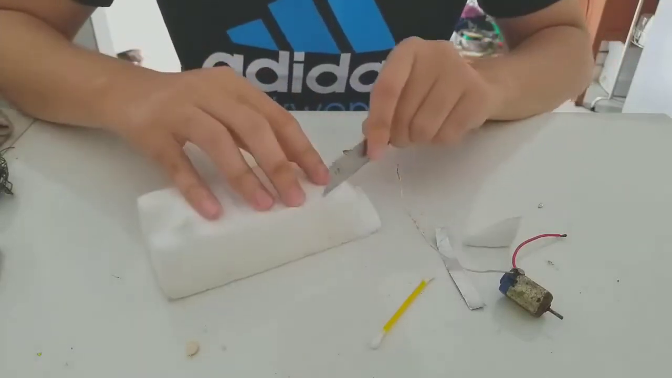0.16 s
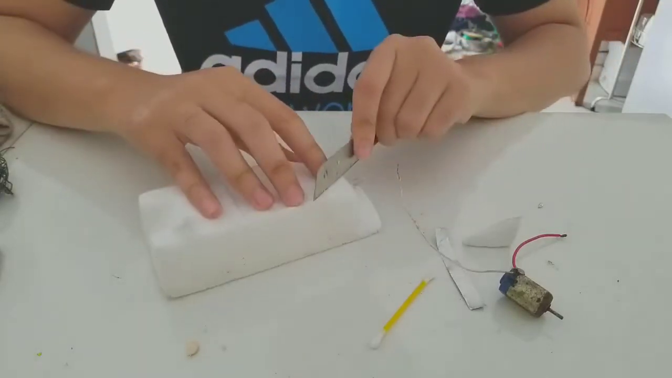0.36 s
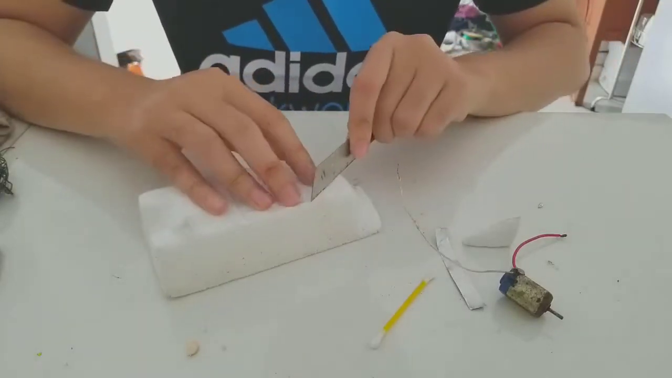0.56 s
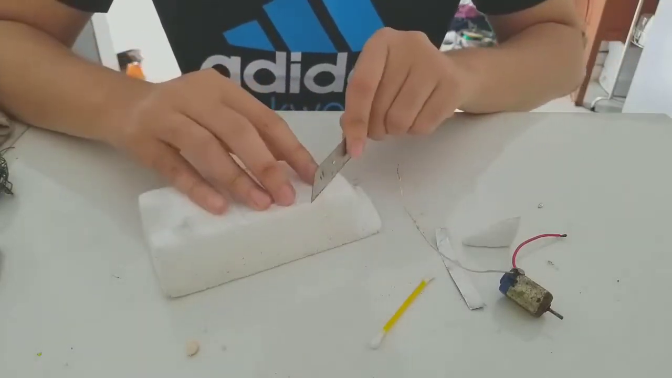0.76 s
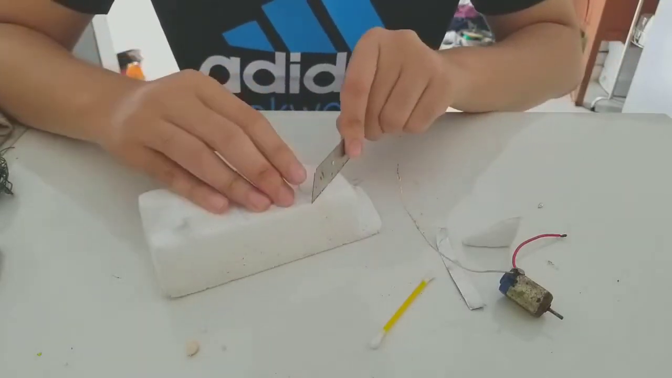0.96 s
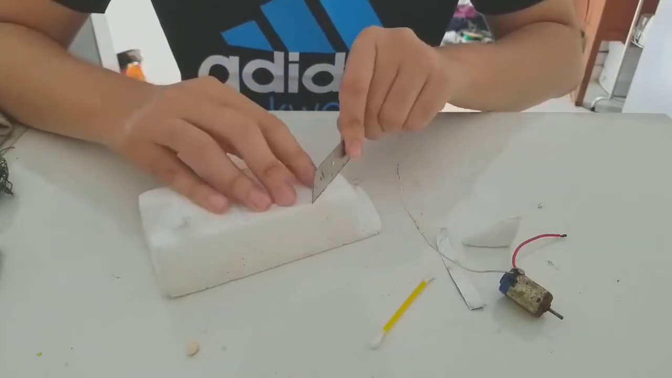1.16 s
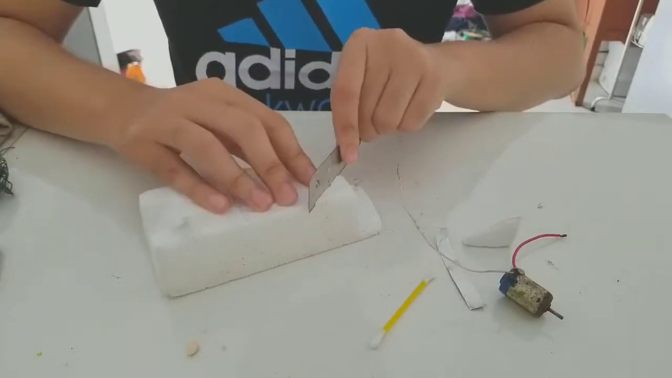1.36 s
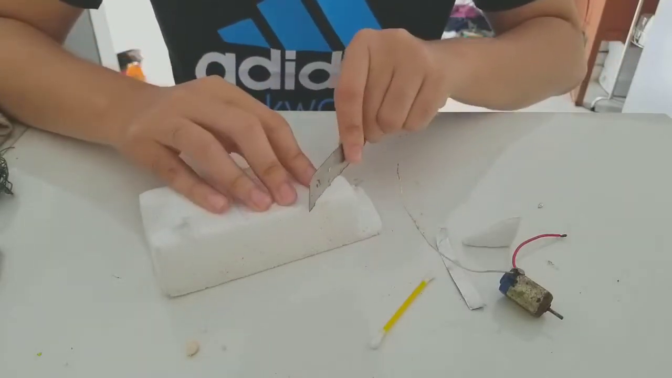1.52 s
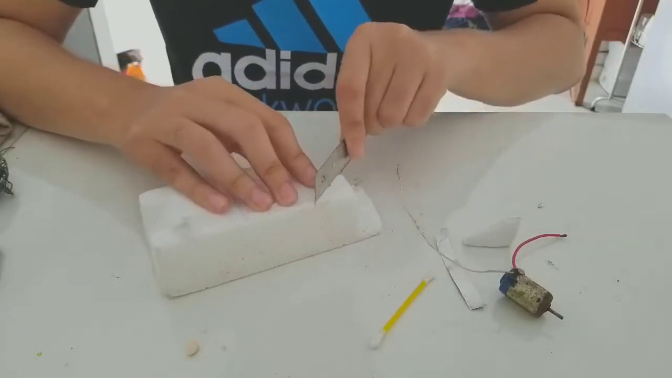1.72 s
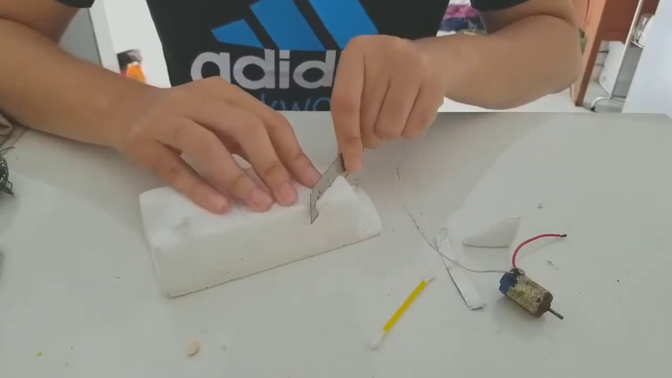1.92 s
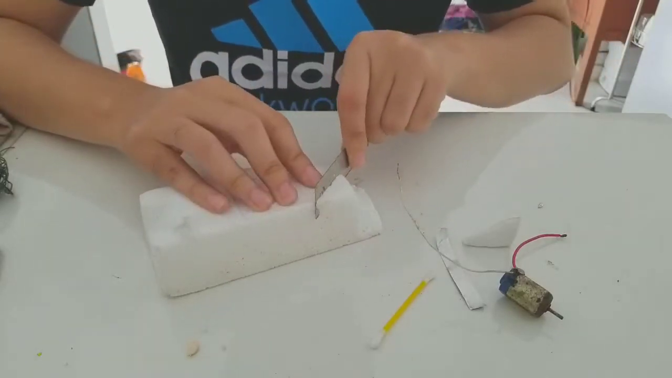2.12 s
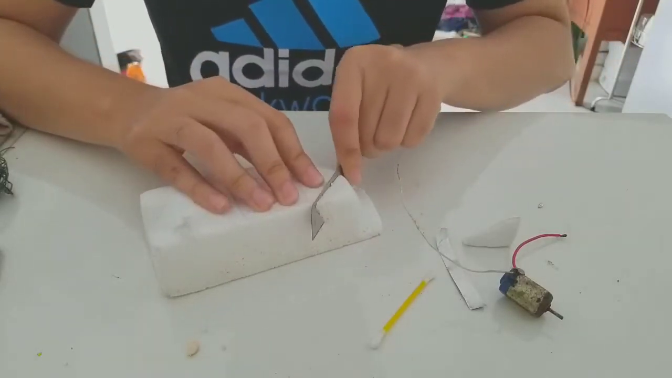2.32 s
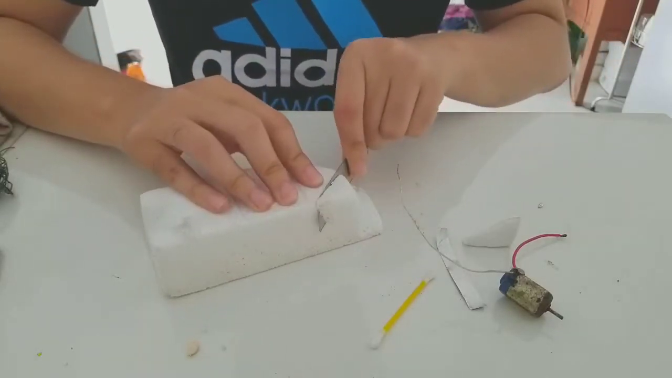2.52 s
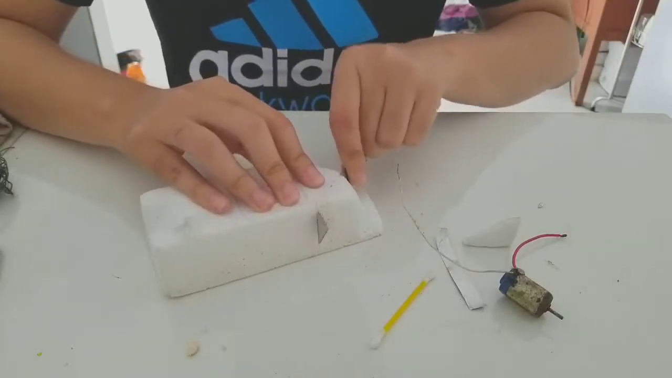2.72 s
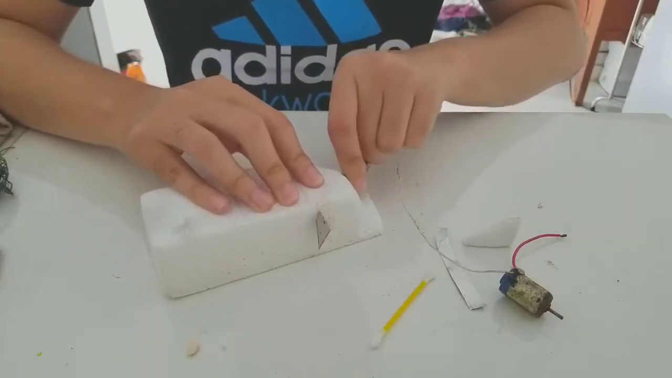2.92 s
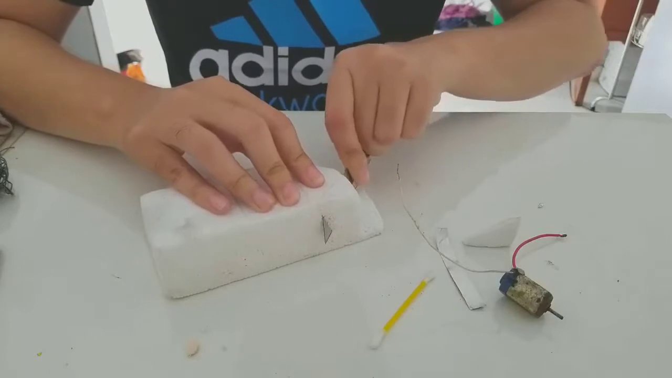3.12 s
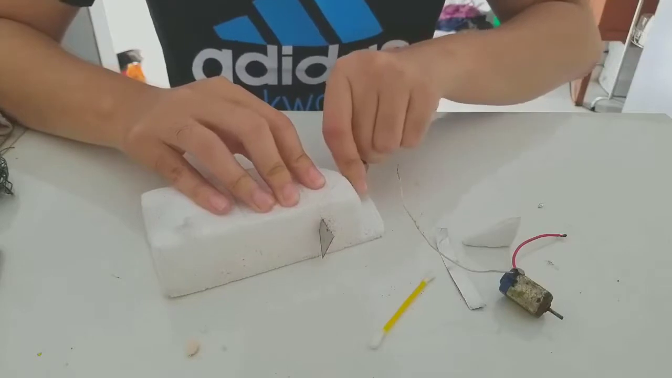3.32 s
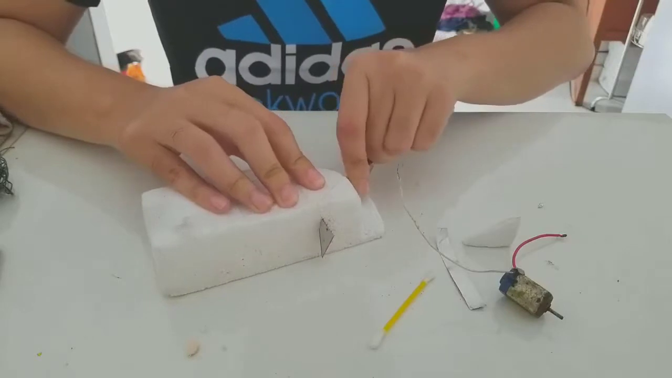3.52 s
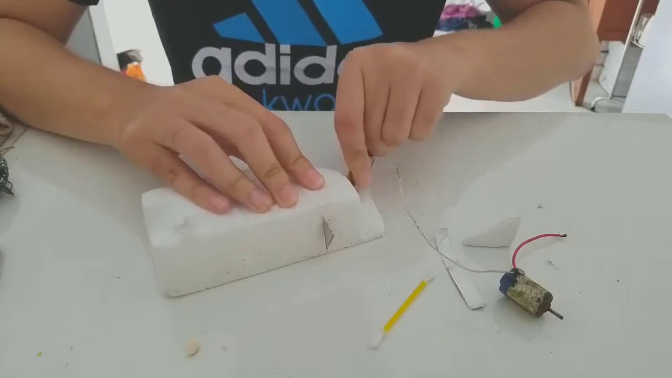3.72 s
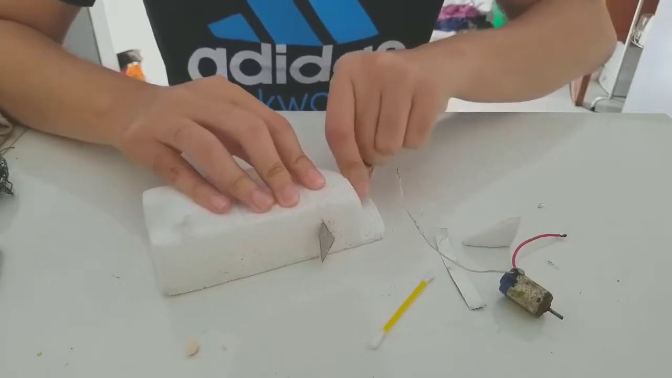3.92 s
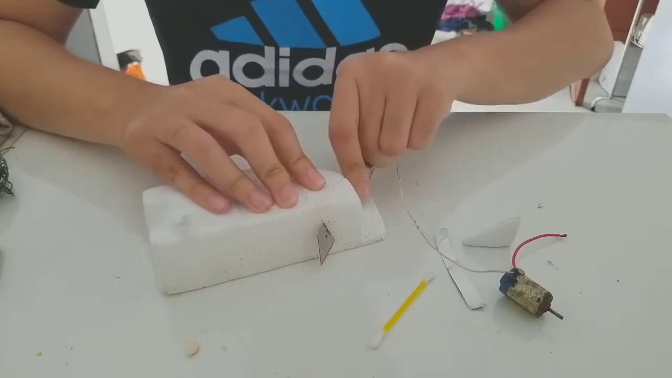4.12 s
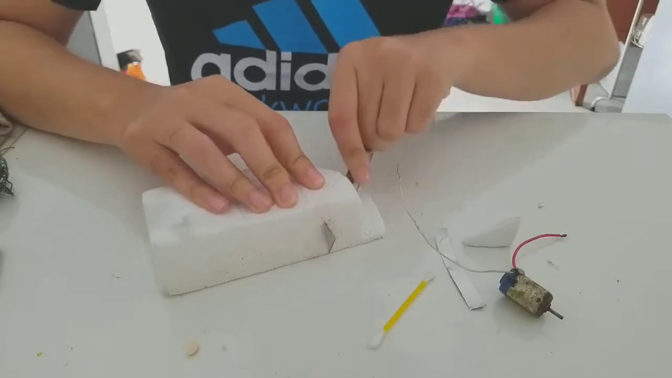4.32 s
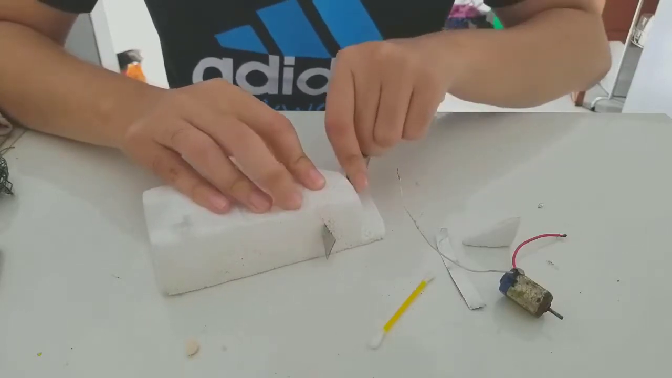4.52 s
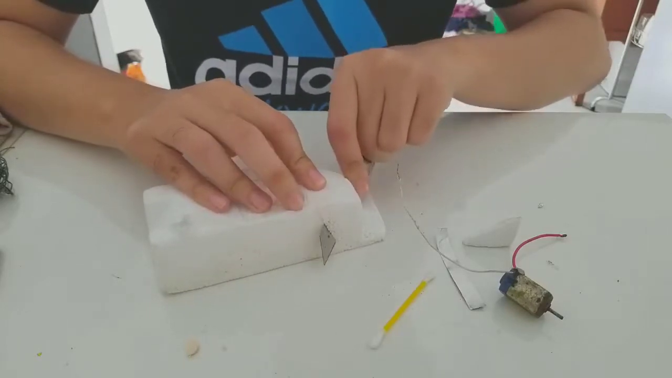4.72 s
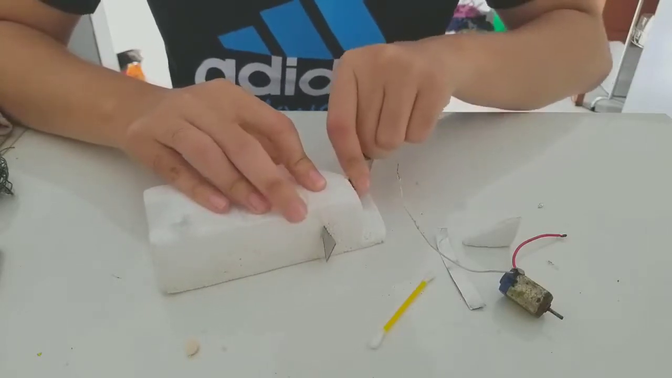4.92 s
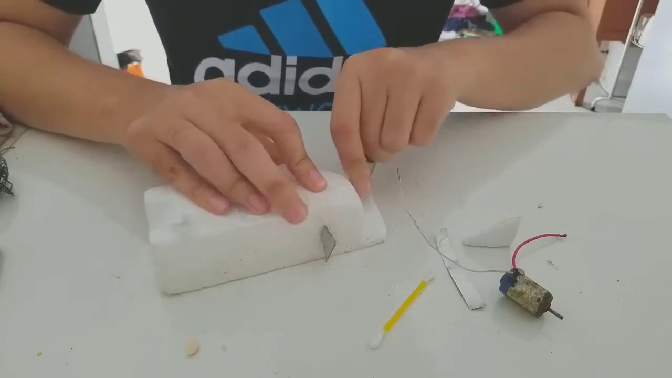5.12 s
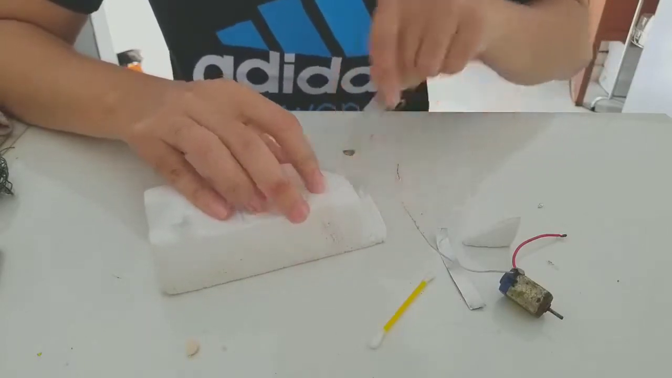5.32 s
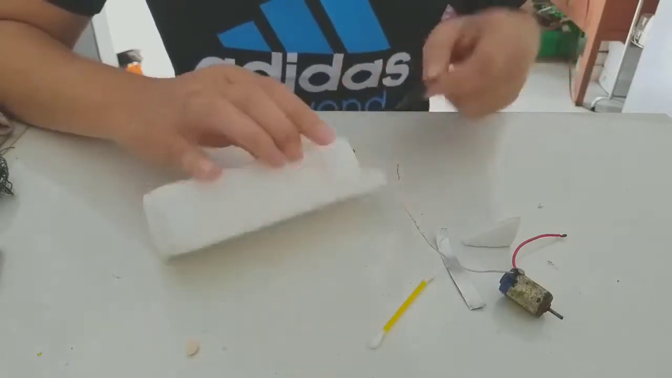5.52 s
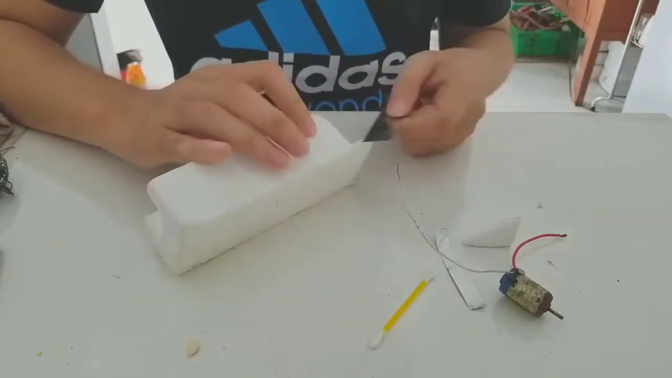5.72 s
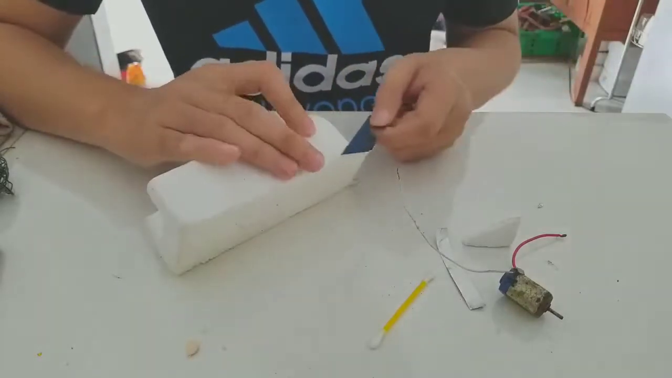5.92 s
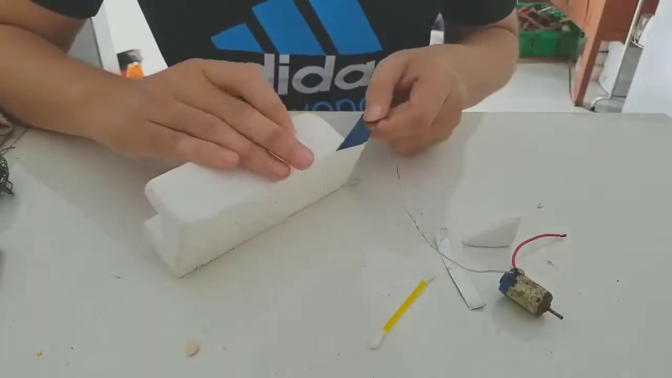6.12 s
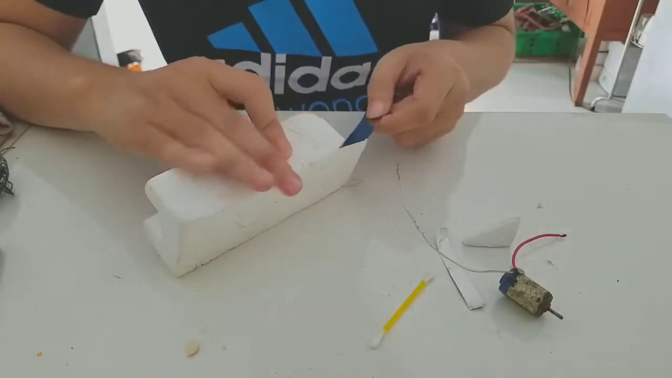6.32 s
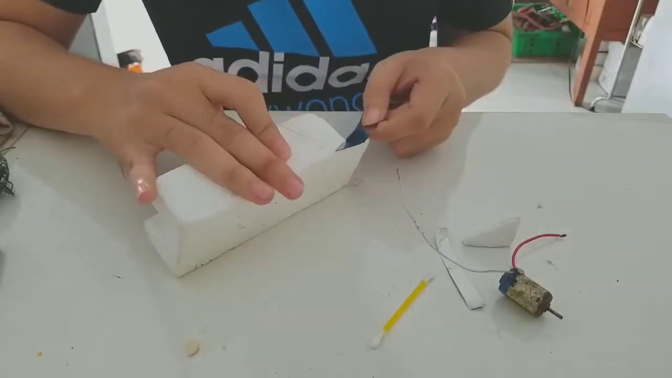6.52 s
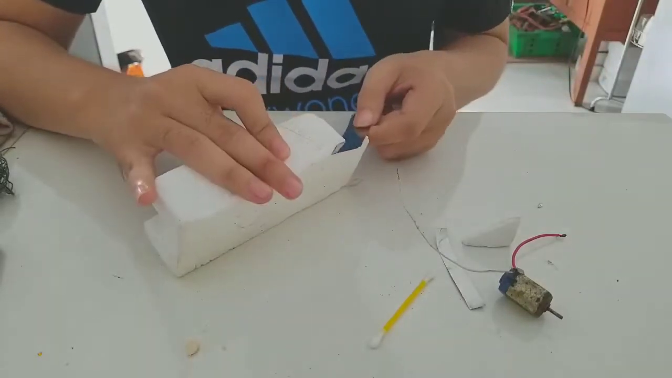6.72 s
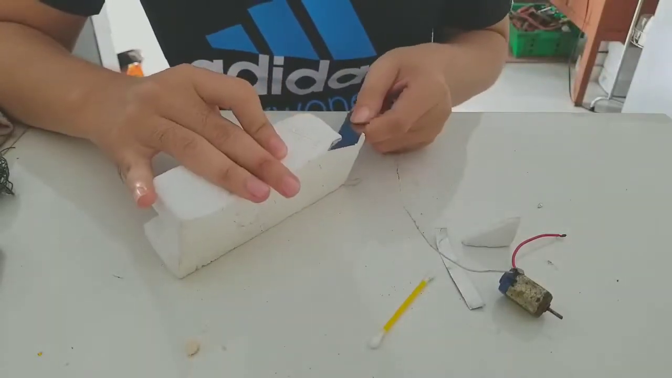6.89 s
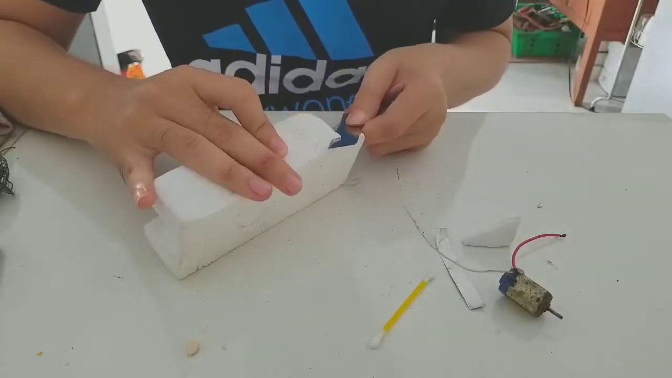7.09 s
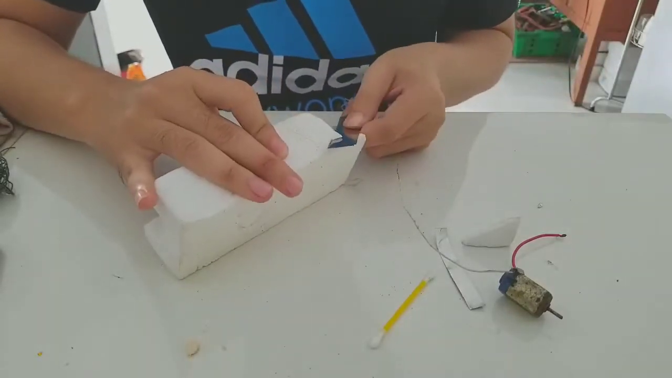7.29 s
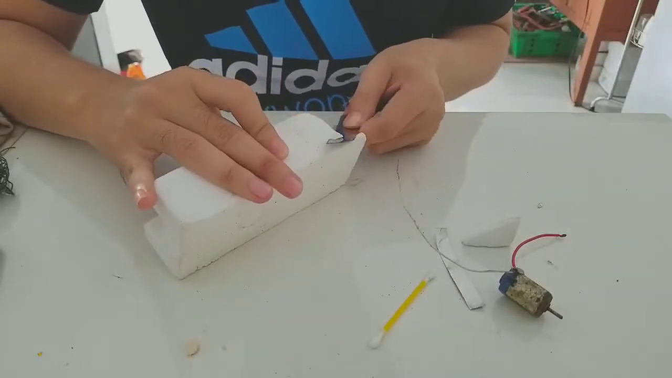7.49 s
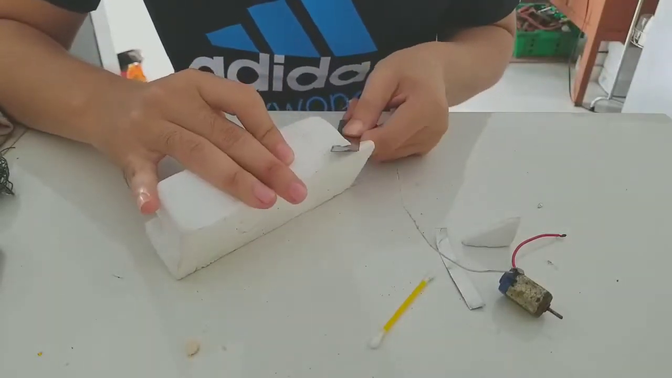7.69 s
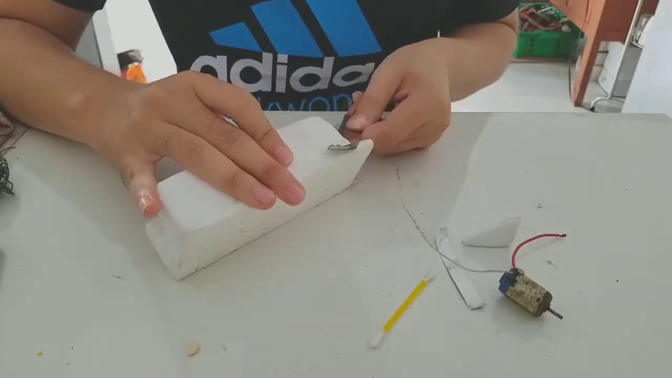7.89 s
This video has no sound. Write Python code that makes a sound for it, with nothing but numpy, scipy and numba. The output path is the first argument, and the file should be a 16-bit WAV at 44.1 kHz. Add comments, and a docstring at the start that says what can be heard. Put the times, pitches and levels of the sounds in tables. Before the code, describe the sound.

Close, crisp strokes rasp through a foam block, pausing irregularly, squeaking sharply at times, while the block thuds softly in a quietly humming room.

```python
"""In a small room with a faint fan hum, a thin blade saws through polystyrene foam on a table, close by.
Each stroke is a dense random stream of bursting cells, which hiss, tear in the slit and ring the block.
Beads snap as decaying noise, the block slides and bumps on the table, and the blade squeals by stick-slip.
The block is turned over partway through, and its dull low note grows stronger."""
import sys
import numpy as np
from scipy import signal
from scipy.fft import rfft, irfft, next_fast_len
from scipy.io import wavfile
from numba import njit

SR = 44100
rng = np.random.default_rng(int(sys.argv[2]) if len(sys.argv) > 2 else 0)


def waveform_to_disk(signal):
    """Save audio, clipped to [-1, 1], as 16-bit WAV at the path in sys.argv[1]."""
    frames = np.transpose(np.atleast_2d(signal))
    scaled = np.clip(frames, -1, 1) * 32767
    samples = np.round(scaled).astype(np.int16)
    wavfile.write(sys.argv[1], SR, samples)


N = 350595
TIME = np.arange(N) / SR
CUTOFF_HZ = 16000


def from_db(db):
    """Decibel law: 20 dB is a factor of ten in amplitude."""
    return 10 ** (np.asarray(db) / 20)


def rms_one(x):
    """Normalisation to unit root-mean-square amplitude."""
    return x / np.sqrt(np.mean(x ** 2) + 1e-20)


def in_time(rows):
    """Linear interpolation of each column over time."""
    s, *columns = np.transpose(rows)
    return [np.interp(TIME, s, column) for column in columns]


def drift(rate_hz):
    """Low-passed noise: a random wander of rms 1 from two equal poles at the given rate."""
    # computed at a twentieth of the sample rate; the first 4000 values let the filter settle
    pole = np.exp(-40 * np.pi * rate_hz / SR)
    noise = rng.standard_normal(N // 20 + 4002)
    slow = signal.lfilter([1], [1, -2 * pole, pole * pole], noise)[4000:]
    return np.interp(np.arange(N) / 20, np.arange(len(slow)), rms_one(slow))


def colour(x, spectrum):
    """Spectral shaping: a gain curve, straight in dB over log frequency, then scaling to rms 1."""
    size = next_fast_len(N)
    hz, db = np.transpose(spectrum)
    log_hz = np.log(np.maximum(np.arange(size // 2 + 1) * SR / size, 1))
    gain = from_db(np.interp(log_hz, np.log(hz), db, left=-90, right=-90))
    return rms_one(irfft(rfft(x, size) * gain, size)[..., :N])


def butter(x, hz, kind, order=2):
    """Butterworth filtering: a maximally flat passband."""
    sections = signal.butter(order, hz, kind, fs=SR, output="sos")
    return signal.sosfilt(sections, x + 1e-18)


@njit
def resonate(x, hz, width_hz):
    """Damped resonance: two poles whose centre moves while the bandwidth stays fixed."""
    y, r = np.zeros(len(x)), np.exp(-np.pi * width_hz / SR)
    for i in range(2, len(x)):
        drive = (1 - r * r) / 2 * (x[i] - x[i - 2])
        y[i] = drive + 2 * r * np.cos(2 * np.pi * hz[i] / SR) * y[i - 1] - r * r * y[i - 2]
    return y


def lagged(x, count):
    """Time-of-arrival stereo: the left port hears a few samples later."""
    return np.array([np.pad(x[0], (count, 0))[:N], x[1]])


# Fan hum. Each row: frequency in Hz, mean level in dB rms before the wavering and channel trim.
FAN_HUM = [(98.6, -56), (123.8, -60), (148.6, -56.5), (251, -64), (399, -73.5), (490.5, -72)]
# Spectrum of the dull room noise. Each row: frequency in Hz, relative gain in dB.
ROOM_NOISE_SPECTRUM = [(22, -17), (35, -16), (50, -3.5), (70, 4), (105, -4), (150, -3), (200, -8.5),
                       (300, -15.5), (430, -19), (560, -28), (720, -33.5), (1200, -44), (2000, -49),
                       (4500, -70), (12000, -50.5), (16000, -53.5)]


def background(rumble_db=-53.0, width_db=-11, waver_db=3.0):
    """Superposition: sinusoids of wandering level and phase over mid-side coloured noise."""
    hum = np.zeros(N)
    for hz, db in FAN_HUM:
        level = np.sqrt(2) * from_db(db + waver_db * drift(5.7))
        hum += level * np.sin(2 * np.pi * hz * TIME + 0.8 * drift(2.2))
    mid, side = colour(rng.standard_normal((2, N)), ROOM_NOISE_SPECTRUM)
    # the noise is wider above 300 Hz
    side = from_db(width_db) * side + from_db(-2.5) * butter(side, 300, "high")
    return hum + from_db(rumble_db) * (mid + side * np.array([[1], [-1]]))


def stroke_shape(start_s, length_s, rise_db, swell_db, ease_db, attack_db_per_s, fade_db_per_s):
    """Exponential onset and decay: straight lines in dB around a flat arch that leans with the pressure."""
    done = np.clip((TIME - start_s) / length_s, 0, 1)
    arch = rise_db * (done - .5) - swell_db * (1 - done) ** 4 - ease_db * done ** 4
    before = np.maximum(start_s - TIME, 0)
    after = np.maximum(TIME - start_s - length_s, 0)
    return arch - attack_db_per_s * before - fade_db_per_s * after


# every stroke swells as the blade speeds up and eases off as it slows
HISS_SWELL_DB, HISS_EASE_DB = 9, 13
# tearing and ringing deep in the cut are more even, and die sooner than the hiss by the last factor
BITE_ATTACK_DB_PER_S, BITE_SWELL_DB, BITE_EASE_DB, BITE_FADES_FASTER = 653.5, 1.7, 9, 2.26
# grazing alone tears and shakes the block a little (dB relative to the hiss)
GRAZE_TEAR_DB, GRAZE_RING_DB = -29, -32.5
# The gripped block rustles faintly between strokes. Entries: hiss, tearing and block ring,
# each in dB before its layer gain.
REST_LEVELS = [-79, -82, -81.5]
# Blade strokes, and at 5.422 s a slide of the block over the table.
# Each row: start in seconds, length in seconds, delay until the edge bites in seconds,
# hiss attack in dB per second, hiss fade in dB per second, rise from start to end in dB,
# then surface hiss, tearing and block ring in dB before the stroke's shape and the layer gains.
STROKES_AND_SLIDE = [(0.0, 0.155, 0.005, 600, 260, -9, -44.0, -85, -70),
                     (0.204, 0.063, 0.011, 600, 90, 6.0, -53.5, -79, -65.5),
                     (0.568, 0.053, 0, 1800, 200, 11.5, -37, -65.5, -59.5),
                     (0.648, 0.079, 0.0, 600, 113, 1, -40.5, -70, -58.0),
                     (0.896, 0.041, 0.0, 600, 172, 11.0, -41.5, -58.5, -64),
                     (1.3, 0.16, 0.023, 2500, 146.5, 10, -30.5, -37.5, -35),
                     (1.602, 0.12, 0.019, 1100, 140, 0.0, -22, -34, -37.5),
                     (1.808, 0.14, 0.012, 600, 114, 6, -23, -31.5, -32.5),
                     (2.067, 0.095, 0.015, 600, 127, 2, -27.5, -37.5, -35.5),
                     (2.254, 0.15, 0.03, 1800, 112, 3, -23.5, -31, -34.0),
                     (2.531, 0.12, 0.029, 1800, 187, 3.5, -26.5, -36, -39.5),
                     (2.734, 0.13, 0.031, 1800, 177, 6.5, -23.5, -35.0, -33.0),
                     (3.011, 0.081, 0.032, 1800, 215, 14, -25, -39.0, -38),
                     (3.229, 0.11, 0.043, 1800, 227.5, 12, -27, -40, -37),
                     (3.629, 0.12, 0.023, 1797, 320.5, 24, -37, -41, -41.5),
                     (3.692, 0.13, 0.078, 595, 82.5, 7, -26, -28.5, -37),
                     (3.892, 0.15, 0.0, 600, 179.5, 7, -28.5, -38.0, -42),
                     (4.306, 0.18, 0.032, 600, 178, 4, -30.0, -41, -37),
                     (4.524, 0.14, 0.0, 599, 179.5, 10, -28, -40, -40.5),
                     (4.782, 0.15, 0.059, 600, 120, 8.0, -32, -42.5, -37.5),
                     (5.004, 0.087, 0.006, 600, 124.5, 6, -29.0, -45.5, -47),
                     (5.183, 0.3, 0.057, 600, 262, -3.5, -26.5, -42.0, -37.5),
                     (5.422, 0.31, 0.0048, 597, 380, -8, -33.5, -70, -67),
                     (5.833, 0.125, 0.022, 598.5, 230, 4.5, -53.5, -83, -85),
                     (5.936, 0.064, 0.031, 600, 229, 17, -33, -43.5, -41),
                     (6.071, 0.032, 0.0099, 600, 371, 6.5, -34.5, -47.5, -51),
                     (6.114, 0.017, 0.0, 600, 129, 5, -30.5, -47.5, -51),
                     (6.179, 0.23, 0.019, 600, 230, 0.5, -36, -57, -58),
                     (6.379, 0.052, 0.031, 600, 73.5, 3, -25, -45, -46),
                     (6.464, 0.138, 0.043, 600, 330, -7.5, -37, -43, -41),
                     (6.596, 0.21, 0.033, 600, 184, -13, -36, -53.0, -56),
                     (6.904, 0.079, 0.0, 603, 172, 24.5, -50, -61.5, -51.5),
                     (7.123, 0.11, 0.046, 1800, 209, 13, -33.5, -40.5, -39),
                     (7.39, 0.12, 0.026, 1000, 180.5, 7, -26, -36.5, -32.5),
                     (7.556, 0.17, 0, 600, 159.5, 10, -26.5, -33.5, -42),
                     (7.864, 0.14, 0.02, 1100, 230, -2, -17, -27.5, -32)]


def sawing():
    """Addition of powers: all strokes and the slide give hiss, tear and ring levels in dB."""
    power = np.zeros((3, N))
    for s, length, bite, attack, fade, rise_db, hiss_db, tear_db, ring_db in STROKES_AND_SLIDE:
        # the edge first grazes the surface, then bites
        graze = stroke_shape(s, length, rise_db, HISS_SWELL_DB, HISS_EASE_DB, attack, fade)
        deep = stroke_shape(s + bite, length - bite, rise_db, BITE_SWELL_DB, BITE_EASE_DB,
                            BITE_ATTACK_DB_PER_S, BITE_FADES_FASTER * fade)
        now = graze > -70
        levels_db = [hiss_db + graze[now], tear_db + deep[now], ring_db + deep[now]]
        power[:, now] += from_db(levels_db) ** 2
    power[1:] += power[0] * from_db([[GRAZE_TEAR_DB], [GRAZE_RING_DB]]) ** 2
    return 10 * np.log10(power + from_db(REST_LEVELS)[:, None] ** 2)


def cell_bursts(per_s, size_db, judder_db, spread=1.0):
    """Shot noise: cells burst at random, unevenly sized, in clumps as the edge passes bead after bead."""
    sizes = from_db(size_db * np.minimum(rng.exponential(1, N), 4)) * rng.choice([-1, 1], N)
    bursts = sizes * (rng.random(N) < per_s / SR) * from_db(judder_db * drift(51))
    # each cell radiates in a direction of its own and so reaches the two ports differently
    facing = np.pi / 4 + spread * rng.standard_normal(N)
    return rms_one(bursts * np.array([np.cos(facing), np.sin(facing)]))


def wandering_comb(x, delay_s=.0011, wander=0.221, strength=0.9):
    """Comb filtering: a copy with a wandering delay, different for each port, colours the noise."""
    out = []
    for port in x:
        wandering_s = delay_s * np.exp(wander * drift(2.017))
        out.append(port + strength * np.interp(TIME - wandering_s, TIME, port))
    return np.array(out)


def slit(x, centres_hz, width_hz, strength, wander=0.095):
    """Cavity resonance: the modes of the slit shift as the blade slides through it."""
    for centre in centres_hz:
        hz = np.minimum(centre * np.exp(wander * drift(5)), CUTOFF_HZ)
        x = x + strength * np.array([resonate(port, hz, float(width_hz)) for port in x])
    return x


# The block's reference pitch follows the depth of the cut; its modes lie at fixed ratios to it, and wander.
# Each row: time in seconds, frequency in Hz.
BLOCK_RESONANCE = [(0.0, 1210), (1.05, 1283), (1.35, 1640), (2.45, 1537), (2.6, 1420), (3.82, 1510),
                   (4.0, 1273), (4.6, 1370), (5.05, 1400), (5.22, 1170), (6.0, 1346), (7.0, 1383),
                   (7.4, 1300), (7.95, 1223)]


def block(x, width_hz=360, low_mode=0.76, low_db=-7.5, high_mode=1.04, lowest_hz=980, highest_hz=2300):
    """Modal vibration: two broad modes shift under the grip; so small a body radiates little bass."""
    hz = in_time(BLOCK_RESONANCE)[0] * np.exp(0.09 * drift(4.5))
    ring = []
    for port in x:
        low = from_db(low_db) * resonate(port, low_mode * hz, float(width_hz))
        high = resonate(port, high_mode * hz, float(width_hz))
        ring.append(low - high)
    radiated = butter(np.array(ring), lowest_hz, "high", order=7)
    return butter(radiated, highest_hz, "low")


# dull note of the block where it lies on the table (dB relative to the block ring)
TURNED_S, LOW_NOTE_DB, LOW_NOTE_TURNED_DB = 5.4, -35.5, -20.5
# Spectra of the surface hiss, of the tearing in the slit and of the dull low note.
# Each row: frequency in Hz, relative gain in dB.
HISS_SPECTRUM = [(3800, -49.5), (4700, -24), (5300, -4.5), (7000, -1.5), (9200, -4), (11000, -1),
                 (12800, -0.5), (15500, 0)]
TEAR_SPECTRUM = [(300, -21), (700, -26), (1200, -23), (1950, 0), (2500, 1.5), (3300, 0), (4400, 3.5),
                 (5200, 3.5), (6500, -3)]
LOW_NOTE_SPECTRUM = [(420, -31.5), (580, -13), (720, -2), (900, -6), (1100, -13)]


def cutting(hiss_gain_db=1.5, tear_gain_db=4.0, ring_gain_db=0.43, brightening=0.22, uneven_db=1.0):
    """Source and filter: bursting cells hiss at the surface, tear in the slit and shake the block."""
    hiss_db, tear_db, ring_db = sawing()
    # among the tiny cells, a whole bead now and then tears loose with a crackle
    beads = cell_bursts(per_s=160, size_db=3.5, judder_db=-2.0, spread=0.63)
    surface_cells = cell_bursts(per_s=14000, size_db=2.0, judder_db=1.0)
    surface = wandering_comb(surface_cells + from_db(-13) * beads)
    deep_cells = cell_bursts(per_s=8000, size_db=1.5, judder_db=-0.1)
    deep = wandering_comb(deep_cells + from_db(-9.5) * beads)

    hiss = colour(slit(surface, (7200, 12500, 14200), width_hz=570, strength=0.54), HISS_SPECTRUM)
    # a harder stroke lifts the top of the hiss, a softer one lowers it
    fine = colour(hiss, [(9000, -43.5), (11500, -9), (16000, -0.5)])
    lift_db = brightening * np.clip(hiss_db + 33.0, -8, 10)
    hiss = rms_one(hiss + 0.73 * (from_db(lift_db) - 1) * fine)

    tear = colour(slit(deep, (2600, 3200, 4100), width_hz=58, strength=1.57), TEAR_SPECTRUM)

    shaking = cell_bursts(per_s=4000, size_db=2.0, judder_db=1.7, spread=0.58)
    low_db = np.where(TIME < TURNED_S, LOW_NOTE_DB, LOW_NOTE_TURNED_DB)
    low_note = from_db(low_db) * colour(shaking, LOW_NOTE_SPECTRUM)
    ring = from_db(ring_gain_db) * rms_one(block(shaking)) + low_note

    layers = from_db(hiss_db + hiss_gain_db) * hiss
    layers = layers + from_db(tear_db + tear_gain_db) * tear
    layers = layers + from_db(ring_db) * ring
    # the foam is unevenly dense along the cut
    return lagged(from_db(uneven_db * drift(22)) * layers, count=3)


# Single beads snapping. Each row: time in seconds, initial crack level in dB before its high-pass,
# initial knock level in dB before the block filters it.
BEAD_SNAPS = [(0.044, -27, -53), (1.302, -26, -29), (2.249, -40.5, -39), (4.777, -12, -41),
              (5.3943, -11.5, -8), (6.384, -28, -29), (6.498, -20, -36), (6.512, -35, -9.5),
              (7.568, -28, -5.5)]


def snaps(crack_s=0.0035, knock_s=0.0048):
    """Impulsive excitation: a bead gives way with a bright crack and a short knock in the block."""
    crack, knock = np.zeros((2, N)), np.zeros((2, N))
    age = TIME[:SR // 20]
    for s, crack_db, knock_db in BEAD_SNAPS:
        start = round(s * SR)
        now = slice(start, start + len(age))
        crack_noise = rng.standard_normal((2, len(age)))
        crack[:, now] += from_db(crack_db) * np.exp(-age / crack_s) * crack_noise
        # the same knock drives both ports
        knock[:, now] += from_db(knock_db) * np.exp(-age / knock_s) * rng.standard_normal(len(age))
    return butter(crack, 8600, "high", order=3) + block(knock)


# The block bumps and shifts on the table under the hands. Each row: time of the peak in seconds,
# level in dB rms before the swell and channel trim, centre in Hz,
# time from the peak to 1/e of the swell's amplitude in seconds.
TABLE_BUMPS = [(1.40, -40, 131, 0.026), (1.72, -45, 66.5, 0.16), (2.59, -39.5, 112, 0.01),
               (3.30, -37, 105, 0.022), (4.06, -41.5, 129.6, 0.021), (5.349, -37, 99, 0.012),
               (5.372, -38, 365, 0.019), (5.405, -48, 237, 0.03), (5.42, -41.5, 152, 0.056),
               (5.43, -50.5, 575, 0.057), (5.61, -45, 77, 0.11), (5.79, -50.5, 122, 0.12),
               (6.007, -55, 560, 0.033), (6.111, -52.5, 590, 0.017), (6.422, -57.5, 660, 0.047),
               (6.517, -53, 603, 0.014), (7.24, -38, 73.6, 0.022)]


def bumps(width=0.15):
    """Band-limited friction noise: each soft contact is a dull scuff under a Gaussian swell."""
    out = np.zeros(N)
    for s, db, hz, length in TABLE_BUMPS:
        now = np.abs(TIME - s) < .2
        swell = np.exp(-((TIME[now] - s) / length) ** 2)
        band_hz = hz * np.exp([-width, width])
        scuff = swell * butter(rng.standard_normal(len(swell)), band_hz, "band")
        # scale the scuff to the energy of its swell
        out[now] += from_db(db) * scuff * np.linalg.norm(swell) / np.linalg.norm(scuff)
    return out


def stick_slip(hz, db, overtone_db, jitter):
    """Stick-slip oscillation: a rough tone at the slip rate; smeared slips put overtones out of step."""
    rate_hz = hz * np.exp(jitter * drift(700)[:len(hz)])
    phase = 2 * np.pi * np.cumsum(rate_hz) / SR
    k = np.arange(1, 6)[:, None]
    overtones = np.sin(k * phase + np.pi * k * k / 4) * (k * hz < CUTOFF_HZ)
    return np.sqrt(2) * np.sum(from_db(db + (k - 1) * overtone_db) * overtones, axis=0)


# long squeals grow sharper and less regular as the blade stalls:
# step from one overtone to the next (dB), scatter of the slip rate (share)
OVERTONE_START_DB, OVERTONE_END_DB = -12, 1
JITTER_START, JITTER_END = .016, .045
# short squeaks all fall through the same range and swell in an arch
SQUEAK_START_HZ, SQUEAK_END_HZ, SQUEAK_ARCH_DB, SQUEAK_OVERTONE_DB = 2650, 1100, 13, -8
# Long stick-slip squeals, one curve each. Each row of a curve: time in seconds, slips per second,
# level of the fundamental in dB rms before the flutter.
LONG_SQUEALS = [
    [(3.700, 8200, -38), (3.714, 5700, -22), (3.735, 5370, -17), (3.743, 5150, -23), (3.755, 4000, -21.5),
     (3.765, 3860, -21.5), (3.787, 3450, -22.5), (3.810, 1090, -28), (3.818, 1180, -51)],
    [(7.867, 1150, -34), (7.880, 1300, -31), (7.897, 3400, -24.5), (7.913, 3800, -27), (7.937, 2650, -20.5),
     (7.950, 2950, -29)],
]
# Short squeaks where a stroke stalls. Each row: start in seconds, length in seconds,
# level of the fundamental in dB rms at the crest of the arch, before the flutter.
SHORT_SQUEAKS = [(4.458, 0.0084, -28), (4.9, .022, -30), (7.682, 0.029, -38.5)]


def squeals(flutter_db=-1.5):
    """Friction instability: the stalling blade sticks and slips, and the slip rate sets the pitch."""
    out = np.zeros(N)
    for rows in LONG_SQUEALS:
        now = (TIME >= rows[0][0]) & (TIME <= rows[-1][0])
        hz, db = (curve[now] for curve in in_time(rows))
        overtone_db = np.linspace(OVERTONE_START_DB, OVERTONE_END_DB, len(hz))
        jitter = np.linspace(JITTER_START, JITTER_END, len(hz))
        out[now] += stick_slip(hz, db, overtone_db, jitter)
    for s, length, db in SHORT_SQUEAKS:
        now = (TIME >= s) & (TIME <= s + length)
        done = (TIME[now] - s) / length
        hz = SQUEAK_START_HZ + (SQUEAK_END_HZ - SQUEAK_START_HZ) * done ** 2
        arch_db = db - SQUEAK_ARCH_DB * (2 * done - 1) ** 2
        out[now] += stick_slip(hz, arch_db, SQUEAK_OVERTONE_DB, JITTER_END)
    flutter = from_db(flutter_db * np.array([drift(150), drift(150)]))
    return lagged(out * flutter, count=2)


def room(x, tail_db=-14, t60_s=0.14):
    """Reverberation: the direct sound and a faint, exponentially decaying tail, different at each port."""
    age = TIME[:SR // 3]
    # the tail begins 4 ms after the direct sound
    tail = rng.standard_normal((2, len(age))) * from_db(-60 * age / t60_s) * (age > .004)
    tail = rms_one(tail) / np.sqrt(len(age))
    return x + from_db(tail_db) * signal.fftconvolve(x, tail, axes=1)[:, :N]


def scene(left_db=-0.32, right_db=1.0):
    """Intensity stereo: the cut lies slightly to the right of the microphone."""
    surroundings = background()
    foam = cutting() + snaps()
    surroundings = surroundings + bumps()
    foam = foam + squeals()
    return room(foam) * from_db([[left_db], [right_db]]) + surroundings * from_db([[-.3], [.3]])


def record(dry, top=0.48):
    """Saturation and band limiting: the loudest peaks are rounded and the treble is cut steeply."""
    rounded = top * np.tanh(dry / top)
    low_pass = signal.ellip(12, .1, 85, CUTOFF_HZ, fs=SR, output="sos")
    return signal.sosfilt(low_pass, rounded)


dry = scene()
out = record(dry)
waveform_to_disk(out)
```